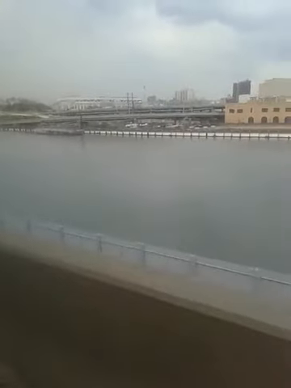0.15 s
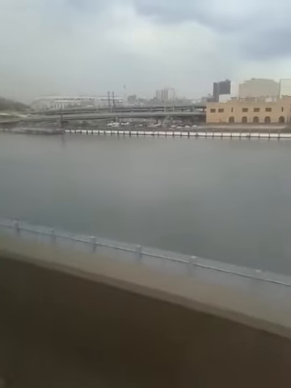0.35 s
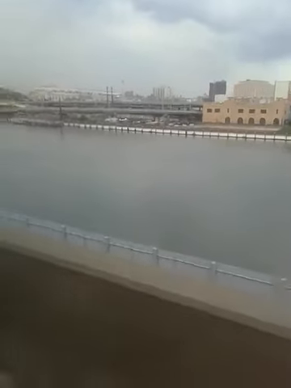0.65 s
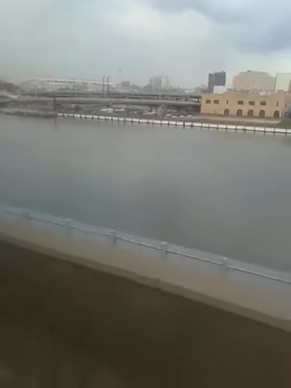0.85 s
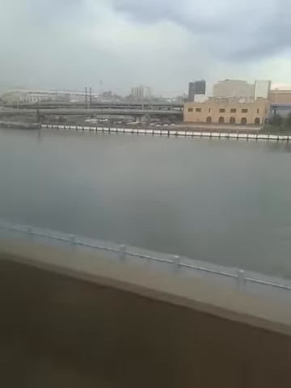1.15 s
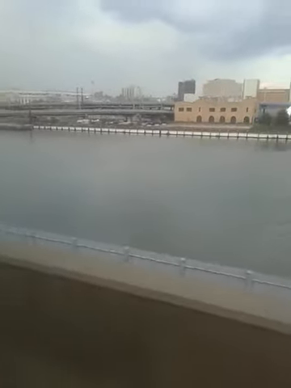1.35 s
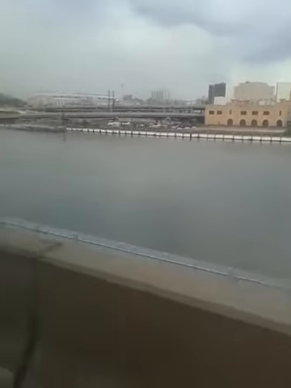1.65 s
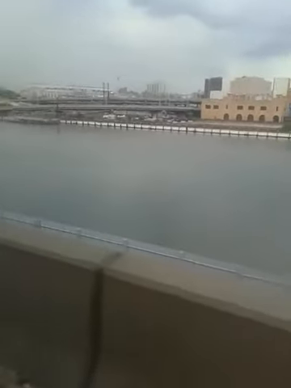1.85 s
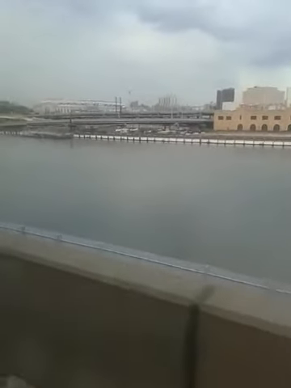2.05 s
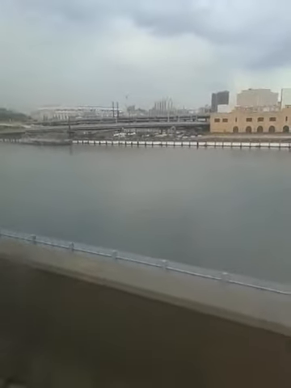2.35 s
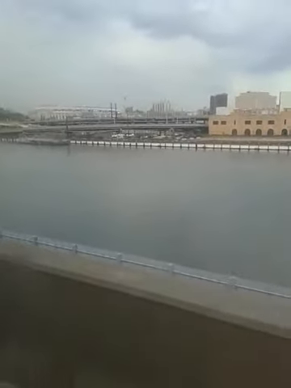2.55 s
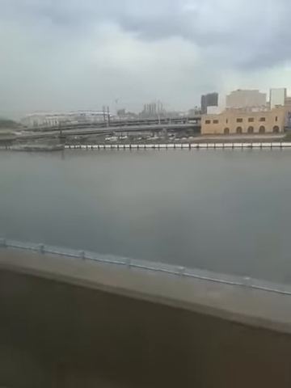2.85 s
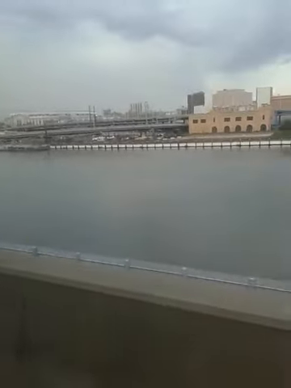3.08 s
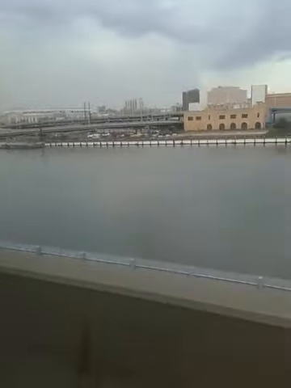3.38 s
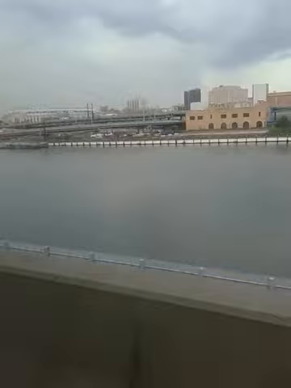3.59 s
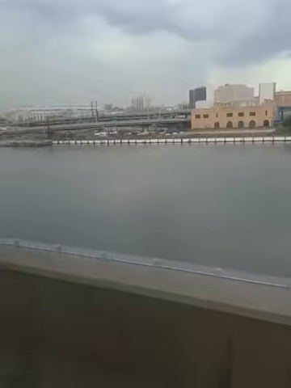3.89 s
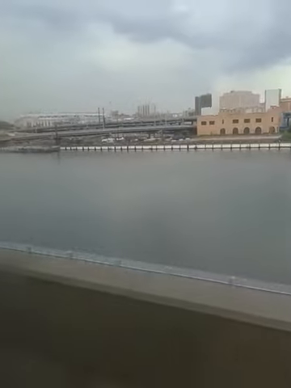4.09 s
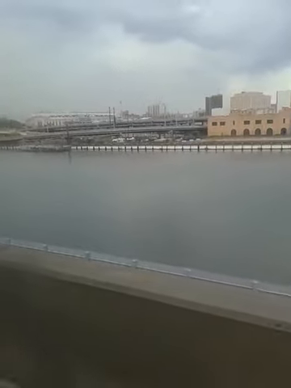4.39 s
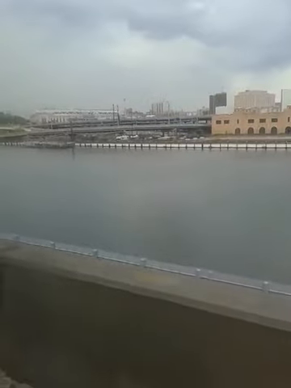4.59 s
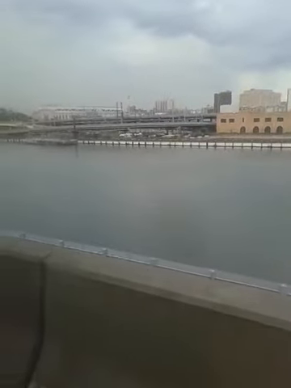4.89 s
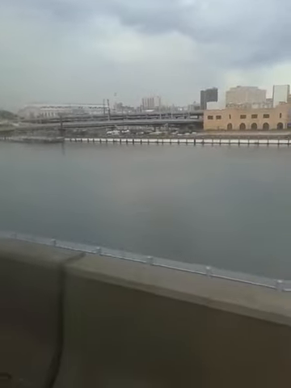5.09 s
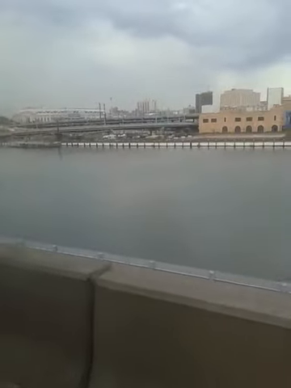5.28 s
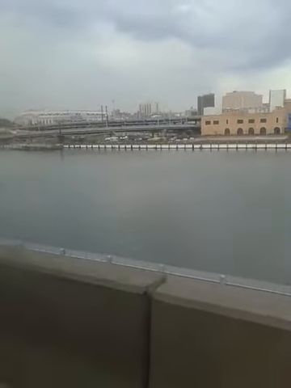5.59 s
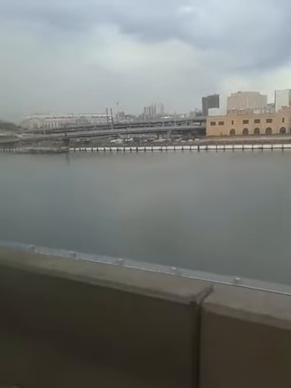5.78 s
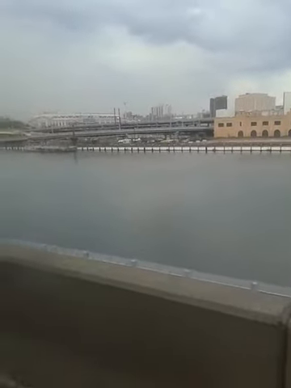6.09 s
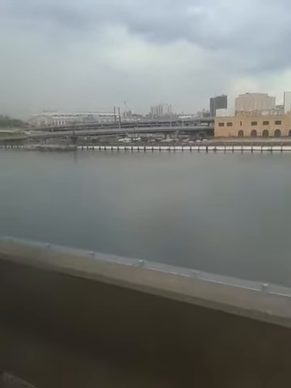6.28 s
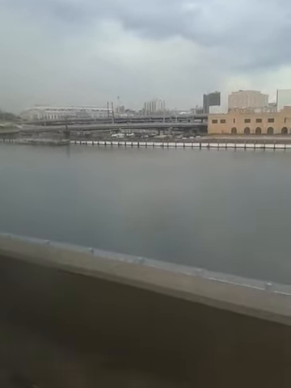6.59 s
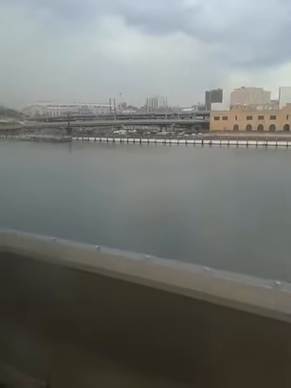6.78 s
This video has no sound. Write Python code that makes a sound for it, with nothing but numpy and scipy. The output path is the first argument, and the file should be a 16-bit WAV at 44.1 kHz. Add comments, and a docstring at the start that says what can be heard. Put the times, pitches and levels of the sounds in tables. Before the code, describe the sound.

Inside a bus on a riverside road, soft boomy rumble and tyre noise run throughout with thin steady hums. A low moan sinks at the start while cloth rustles near the microphone, with a few ticks at two seconds. A buzzing engine alongside swells to a peak past three seconds, then abruptly drops, sags in pitch and fades. A slower engine drones underneath, and a car slips past near the end.

```python
"""Inside a bus on a riverside road, an engine in the next lane swells, sags and fades. Its note is a stack of
sines, four firings a cycle, with noise for the exhaust. A slower engine drones in later and a car slips past
with a dropping note. Shaped noise makes the rumble of body and tyres; two thin hums keep their pitch, a faint
whistle and short squeaks sit high above, and a low moan sinks at the start. Cloth or fingers rustle and tick
close to the microphone, made of grainy noise and short knocks."""
import sys
import numpy as np
from scipy import signal
from scipy.fft import rfft, irfft, next_fast_len
from scipy.io import wavfile
from scipy.ndimage import uniform_filter1d

SR = 44100
rng = np.random.default_rng(int(sys.argv[2]) if len(sys.argv) > 2 else 0)


def generate_wav(sig):
    """Save sig (samples, or channels by samples) to the path in sys.argv[1] as 16-bit PCM at SR."""
    pcm = np.round(np.clip(np.atleast_2d(sig).T, -1, 1) * 32767).astype(np.int16)
    wavfile.write(sys.argv[1], SR, pcm)


N = 306054  # length in samples

# An "order" is how many times a tone repeats in one engine cycle.
# engine in the next lane: (time [s], firing rate [Hz], firing tone [dB], overtones [dB],
# orders between them [dB], exhaust roar [dB])
ENGINE_COURSE = [(0, 159, -39.5, -61, -45.5, -44.5), (.8, 157.8, -42.5, -54, -51.5, -46.5),
                 (1.35, 154.1, -39, -50.5, -49, -47.5), (1.8, 155.4, -28, -46, -44.5, -46),
                 (2.3, 155.8, -23.5, -42, -43.5, -43), (2.6, 155.6, -23, -38.5, -41.5, -41),
                 (2.82, 156.2, -18.5, -33.5, -37, -36.5), (3.05, 152.8, -15.5, -32, -39, -37),
                 (3.27, 145.6, -12, -27, -41.5, -32.5), (3.4, 145.8, -13, -25, -40.5, -31.5),
                 (3.6, 151.5, -15, -25.5, -43.5, -32.5), (3.75, 155.6, -16, -33, -41.5, -35.5),
                 (3.95, 156.1, -17, -26.5, -44, -38), (4.18, 156.1, -15, -28.5, -44.5, -41),
                 (4.3, 149, -31, -33.5, -50, -41.5), (4.42, 147, -25, -39.5, -44.5, -42.5),
                 (4.62, 141.6, -27, -51, -48.5, -44), (4.8, 138.5, -22.5, -45.5, -47.5, -45.5),
                 (5.1, 139.5, -33.5, -49, -54, -46.5), (5.6, 141.5, -39.5, -48.5, -55, -45),
                 (5.95, 143.3, -31, -49, -44.5, -43), (6.3, 140.7, -34.5, -51, -48, -44.5),
                 (6.94, 139.5, -42, -53, -50.5, -46.5)]
# strength moves from the lower side of the firing tones to the upper as the engine comes alongside:
# (time [s], orders below [dB], orders above [dB], upper firing tones [dB])
SIDE_LEVELS = [(0, -62, -61.5, -63), (2.05, -43.5, -49, -59), (2.75, -41, -46, -59), (3, -36, -56, -50),
               (3.24, -41, -33.5, -46), (3.36, -42.5, -36, -50), (3.5, -45, -34.5, -36),
               (3.7, -49.5, -54, -40.5), (4.15, -60, -55, -40.5), (4.33, -60.5, -50.5, -52),
               (5.1, -61.5, -56, -58), (6.94, -56, -58, -58.5)]
# overtones that stand out clean: (order, level re overtones [dB], fading [dB], phase slip [rad])
CLEAN_OVERTONES = [(8, 0, 1, 0.29), (12, -1, 3, 0.46)]
# clean orders between: (order, level re orders between [dB], fading [dB], phase slip [rad])
CLEAN_BETWEEN = [(2, 3, 3, .05), (3, 5.5, 2.3, .05), (10, -12, 5.7, .05)]
# weaker orders between, from unequal cylinders: (order, level re orders between [dB])
UNEVEN_ORDERS = [(1, -8), (5, -4), (6, -1.5), (14, -20), (18, -12.5)]
# upper firing tones: (order, level re upper firing tones [dB])
UPPER_TONES = [(16, -1), (20, -1.5), (24, -9), (28, -15)]
# one order below each firing tone: (order, level re orders below [dB])
ORDERS_BELOW = [(7, 0), (11, 0.5), (15, -14.5), (19, -18.5)]
# one order above each firing tone: (order, level re orders above [dB])
ORDERS_ABOVE = [(9, -2.5), (13, -0.5), (17, -3.5), (21, -8.5)]
# reflections cancel or lift one order for a moment: (time [s], order, width [s], change [dB])
REFLECTIONS = [(2.1, 4, 0.13, -14.5), (2.88, 4, 0.065, -13.5), (3.2, 4, 0.07, -10), (3.5, 4, 0.069, -9),
               (4.53, 4, 0.057, -14), (2.58, 8, 0.13, -15), (3.04, 8, 0.045, -12), (3.19, 8, 0.068, -12.5),
               (3.36, 8, 0.032, -18), (3.5, 8, 0.048, -16.5), (3.66, 8, 0.021, -14.5),
               (3.88, 8, 0.049, -15.5), (2.14, 12, .15, 5), (2.48, 12, .07, -6.5), (2.73, 12, 0.06, -12),
               (3.2, 12, .05, -8.5), (3.38, 12, .04, -13), (3.77, 12, 0.023, -9.5), (4.01, 12, .3, -7),
               (4.1, 12, .05, -7), (4.15, 12, .05, -12), (4.35, 12, .1, -3), (3.33, 3, .15, -11.5),
               (3.95, 3, .33, 7.5), (1.57, 2, .1, 10), (3.02, 6, .05, 12.5), (3.2, 10, 0.19, 15.5),
               (2.98, 11, 0.042, 3.5), (3.31, 11, .04, 12.5), (3.52, 12, 0.051, 2), (2.8, 16, .06, 10),
               (3.22, 17, 0.064, 5), (3.47, 16, .04, 4.5), (3.47, 17, .05, 3.5), (2.7, 2, .35, -3.5),
               (3.5, 21, .1, 5), (3.18, 7, .08, 6)]
# the weak orders waver up to this share more while the engine is closest
ALONGSIDE_S, ALONGSIDE_WIDTH_S, ROUGHER = 3.3, .3, .8
# colour of the exhaust roar: (pitch [Hz], strength [dB per Hz])
ROAR_COLOUR = [(100, -33), (200, -12), (400, -12.5), (700, -16), (950, -21.5), (1150, -26.5), (1800, -29),
               (2300, -29.5), (2800, -34.5), (3700, -42), (4400, -44), (5800, -56), (9000, -85)]
# raspy bursts in the exhaust: (time [s], width [s], level [dB])
RASP_BURSTS = [(3.335, .045, -48), (3.55, .055, -49)]
# colour of the bursts: (pitch [Hz], strength [dB per Hz])
RASP_COLOUR = [(1500, -40), (2100, -7.5), (2400, 0), (2750, -8), (3600, -40)]
# slower engine: (time [s], fifth order [Hz], fifth order [dB], high orders [dB])
DRONE_COURSE = [(4.1, 126.4, -33, -54), (4.3, 126.3, -27.5, -51.5), (4.65, 126.1, -42, -58),
                (5.2, 125.3, -34.5, -58.5), (5.5, 124.6, -30.5, -49), (5.75, 125.5, -30, -46),
                (6.02, 125.3, -24, -36), (6.2, 125.2, -28, -41), (6.35, 124.6, -33, -40),
                (6.5, 122.7, -29.5, -38.5), (6.65, 120.5, -39, -40.5), (6.8, 117.7, -30, -40.5),
                (6.94, 115, -26.5, -39)]
# its other orders: (order, level re high orders [dB])
DRONE_OTHER_ORDERS = [(2, -6), (3, -9.5), (7, -2), (9, -0.5), (10, -1), (11, -9.5)]
FOURTH_DB = 4.5  # its fourth order, re high orders
# car going by: (time [s], note [Hz], level [dB])
PASSING_COURSE = [(0, 297.3, -87.5), (5.5, 289, -67.5), (5.68, 288, -48), (5.8, 274.2, -40),
                  (5.92, 269.2, -41), (6.05, 264.7, -54), (6.2, 266, -76), (6.94, 263.7, -90)]
# road felt through the bus: (time [s], body boom [dB], deepest shudder [dB])
ROAD_LEVELS = [(0, -35.5, -52), (.25, -35, -46), (.56, -43, -44), (.95, -36.5, -49), (1.3, -40, -46),
               (1.66, -36.5, -45), (2, -43, -48), (2.3, -33.5, -46), (2.65, -32.5, -41),
               (2.8, -38.5, -38.5), (2.92, -32, -38), (3.3, -33.5, -43.5), (4.05, -42.5, -44),
               (4.6, -37.5, -48), (5.1, -39, -43), (5.8, -36, -41), (6.45, -33.5, -49), (6.94, -48, -47)]
# colour of the body boom: (pitch [Hz], strength [dB per Hz])
BOOM_COLOUR = [(35, -40), (60, -7), (85, 3), (130, -4.5), (200, -16), (280, -11.5), (390, -45.5),
               (660, -120)]
# colour of the deepest shudder: (pitch [Hz], strength [dB per Hz])
SHUDDER_COLOUR = [(12, -39.5), (25, -18), (40, -8), (52, 0.5), (65, -4.5), (90, -31), (200, -120)]
# colour of the tyre noise: (pitch [Hz], strength [dB per Hz])
TYRE_COLOUR = [(80, -28), (150, 4.5), (250, -5.5), (330, -25), (450, -6.5), (600, -15), (950, -10),
               (1150, -16.5), (2000, -24.5), (2700, -29.5), (3100, -33), (4700, -38), (5300, -44.5),
               (6800, -49), (15700, -53)]
# separate rustles: (time of peak [s], time to rise or lose 20 dB [s], ringing part [dB], airy part [dB])
RUSTLES = [(0.070, 0.040, -83.0, -74.0), (0.200, 0.050, -69.0, -75.0), (0.260, 0.040, -73.0, -74.0),
           (0.350, 0.055, -59.0, -66.0), (0.440, 0.060, -71.0, -74.0), (0.530, 0.075, -63.0, -67.0),
           (0.600, 0.020, -69.0, -85.0), (0.660, 0.025, -65.0, -78.0), (0.700, 0.020, -68.0, -82.0),
           (0.760, 0.020, -73.0, -85.0), (0.900, 0.055, -71.0, -76.0), (0.990, 0.040, -75.0, -82.0),
           (1.180, 0.070, -73.0, -80.0), (1.280, 0.040, -73.0, -77.0), (1.400, 0.070, -90.0, -70.0),
           (1.458, 0.040, -74.0, -64.0), (1.685, 0.050, -80.0, -67.0), (1.857, 0.050, -77.0, -60.0),
           (1.980, 0.070, -80.0, -71.0), (2.085, 0.030, -59.0, -68.0), (2.120, 0.035, -50.0, -63.0),
           (2.165, 0.045, -53.0, -63.0), (2.235, 0.075, -60.0, -70.0), (2.340, 0.040, -72.0, -82.0),
           (2.545, 0.070, -67.0, -78.0), (2.680, 0.050, -85.0, -75.0), (2.720, 0.055, -68.0, -76.0),
           (2.985, 0.075, -63.0, -68.0), (3.330, 0.100, -71.0, -71.0), (3.530, 0.080, -78.0, -71.0),
           (4.070, 0.090, -75.0, -68.0), (5.170, 0.100, -74.0, -78.0), (6.000, 0.030, -79.0, -75.0),
           (6.360, 0.080, -77.0, -76.0), (6.900, 0.040, -81.0, -75.0)]
RINGING_REST_DB, AIRY_REST_DB = -84, -79  # between rustles
# colour of the airy part: (pitch [Hz], strength [dB per Hz])
AIRY_COLOUR = [(5000, -34), (8000, -7), (11000, -2), (13000, 2), (15700, 2)]
# ticks, before they are brightened and ring: (time [s], snap [dB], scrape [dB], time to lose 60 dB [s])
TICK_BLOWS = [(1.837, -52, -52, .004), (2.0958, -36, -40, .004), (2.1075, -54, -44, .008),
              (2.1125, -39, -29, .012), (2.1245, -46, -40, .007), (2.129, -46, -38, .007),
              (6.457, -66, -51, .004), (6.4764, -38, -50, .004)]
# resonances of the microphone opening: (pitch [Hz], width [Hz], gain [dB])
PORT_RESONANCES = [(7100, 450, -12.5), (9300, 400, 1), (4770, 1700, -16)]
# low and high hum: (low [Hz], high [Hz])
HUM_PITCHES = 369.9, 521.4
# their levels: (time [s], low hum [dB], high hum [dB])
HUM_LEVELS = [(0, -43, -44.5), (.7, -44, -47.5), (1.15, -51.5, -54), (1.9, -47, -45.5), (2.6, -43, -43.5),
              (3.5, -45.5, -47.5), (4.5, -44.5, -45.5), (6.94, -45, -46.5)]
# weaker hums: (pitch [Hz], level [dB])
WEAK_HUMS = [(921, -59), (1049, -60)]
# faint whistle in the hiss: (time [s], pitch [Hz], level [dB])
WHISTLE_COURSE = [(0, 4580, -90), (.6, 4580, -83), (.9, 4570, -77), (1.3, 4560, -83), (1.8, 4560, -95),
                  (6.94, 4550, -95)]
# sinking moan: (time [s], pitch [Hz], level [dB])
MOAN_COURSE = [(0, 94, -55), (.2, 91.8, -38.5), (.6, 91.3, -43), (.9, 87.5, -41), (1.2, 81.23, -42),
               (1.45, 76.2, -38), (1.8, 70.9, -33.5), (2, 68.3, -49)]
# faint squeaks: (time [s], length [s], start [Hz], middle [Hz], end [Hz], peak level [dB])
SQUEAK_BENDS = [(2.56, .035, 12310, 12500, 12800, -81), (2.64, 0.088, 13780, 14600, 14100, -80.5),
                (2.66, .15, 11730, 12300, 12200, -79.5), (2.81, 0.1, 11650, 11880, 11650, -72),
                (2.824, .03, 12300, 12450, 12600, -71), (2.89, 0.068, 12620, 12170, 12500, -80)]
TOP_HZ = 15750  # band limit of the recorder


def amp(db):
    """Turn dB into a gain."""
    return np.exp(np.asarray(db) * (np.log(10) / 20))


def unit(x):
    """Scale a sound to rms 1."""
    return x / np.sqrt(np.mean(x ** 2) + 1e-20)


def curves(rows):
    """Join the table points by straight lines: one curve for each column after the time."""
    times, *columns = np.transpose(rows)
    return [np.interp(np.arange(N) / SR, times, column) for column in columns]


def wobble(rate):
    """A random curve of straight lines between knots, rate knots a second."""
    knots = rng.standard_normal(int(N * rate / SR) + 4)
    return np.interp(np.arange(N) * rate / SR, np.arange(len(knots)), knots)


def bell(s, width):
    """A smooth bump of height 1 around s seconds."""
    coarse = np.arange(0, N + 64, 64)
    return np.interp(np.arange(N), coarse, np.exp(-((coarse / SR - s) / width) ** 2))


def filtered(x, response, mirror="even"):
    """Filter x by a response to frequency; mirrored ends keep steep filters from ringing."""
    edge = 4096
    size = next_fast_len(N + 2 * edge)
    padded = np.pad(x, (edge, size - N - edge), "reflect", reflect_type=mirror)
    spectrum = rfft(padded * signal.windows.tukey(size, edge / size))
    return irfft(spectrum * response(np.fft.rfftfreq(size, 1 / SR)), size)[edge:edge + N]


def shape(points):
    """A gain for each frequency, read from a colour table on a log pitch axis."""
    hz_points, db_points = np.transpose(points)
    return lambda hz: amp(np.interp(np.log(hz + 1), np.log(hz_points + 1), db_points))


def rush(colour, patchy_db):
    """Coloured noise of rms 1, with patches of random gain in time and pitch."""
    noise = signal.stft(rng.standard_normal(N), nperseg=512)[2]
    patches = uniform_filter1d(rng.standard_normal(noise.shape), size=6, axis=0)
    patches = uniform_filter1d(patches, size=14, axis=1)
    patchy = signal.istft(noise * amp(patchy_db * unit(patches)), nperseg=512)[1][:N]
    return unit(filtered(patchy, shape(colour)))


def tone(turns, db, fade_db=0., slip=0., rate=6):
    """A sine of rms level db; reflections make it fade and slip in phase (slip in rad) at random."""
    level = np.sqrt(2) * amp(db + fade_db * wobble(rate))
    start = rng.random()
    return level * np.sin(2 * np.pi * (turns + start) + slip * wobble(2.5 * rate))


def shift_db(order):
    """The summed momentary changes that reflections make to one order."""
    return sum(db * bell(s, width) for s, k, width, db in REFLECTIONS if k == order)


def engine():
    """Four firings a cycle give a tone and overtones; uneven ones add weak orders between them."""
    hz, firing_db, over_db, between_db, roar_db = curves(ENGINE_COURSE)
    below_db, above_db, upper_db = curves(SIDE_LEVELS)
    rough = 1 + ROUGHER * bell(ALONGSIDE_S, ALONGSIDE_WIDTH_S)
    cycle = np.cumsum(hz) / SR / 4
    out = tone(4 * cycle, firing_db + shift_db(4), fade_db=.7, rate=9)
    for rows, base_db in ((CLEAN_OVERTONES, over_db), (CLEAN_BETWEEN, between_db)):
        for k, db, fade_db, slip in rows:
            out = out + tone(k * cycle, base_db + db + shift_db(k), fade_db, slip, rate=10)
    for rows, base_db in ((UNEVEN_ORDERS, between_db), (UPPER_TONES, upper_db),
                          (ORDERS_BELOW, below_db), (ORDERS_ABOVE, above_db)):
        for k, db in rows:
            level_db = base_db + db + shift_db(k)
            out = out + tone(k * cycle, level_db, fade_db=3, slip=.035 * k * rough, rate=16)
    # the exhaust roar is noise puffed out once a firing
    puffs = 1 + .18 * np.sin(2 * np.pi * 4 * cycle)
    roar = amp(roar_db + wobble(9)) * puffs * rush(ROAR_COLOUR, patchy_db=1.4)
    return out + roar


def rasp():
    """Exhaust bursts: grainy noise in one pipe resonance."""
    grains = rush(RASP_COLOUR, patchy_db=1.5) * amp(3.3 * wobble(60))
    return sum(amp(db) * bell(s, width) for s, width, db in RASP_BURSTS) * grains


def drone():
    """A slower engine, a stack of orders led by the fifth, fades in as the first falls back."""
    hz, fifth_db, high_db = curves(DRONE_COURSE)
    cycle = np.cumsum(hz) / SR / 5
    out = tone(5 * cycle, fifth_db, fade_db=1.2)
    out = out + tone(4 * cycle, high_db + FOURTH_DB, fade_db=4)
    for k, db in DRONE_OTHER_ORDERS:
        out = out + tone(k * cycle, high_db + db, fade_db=2.5, slip=.25)
    fade_in = np.clip((np.arange(N) / SR - DRONE_COURSE[0][0]) / 0.37, 0, 1)
    return out * fade_in


def passing():
    """A short tone and its octave, lowered as the car moves past."""
    hz, db = curves(PASSING_COURSE)
    turns = np.cumsum(hz) / SR
    return tone(turns, db, slip=0.33) + tone(2 * turns, db - 8, slip=0.54)


def handling():
    """Ticks of cloth or fingers: a snap and a scrape each, ringing the microphone opening."""
    blows = np.zeros(N + SR)
    t = np.arange(SR // 30) / SR
    snap = 1.6 * amp(-60 * t / .0012) * np.cos(2 * np.pi * 3800 * t)
    for s, snap_db, scrape_db, t60 in TICK_BLOWS:
        swell = 1 - np.exp(-15 * t / t60)
        scrape = amp(scrape_db - 60 * t / t60) * swell * rng.standard_normal(len(t))
        blows[round(s * SR):][:len(t)] += amp(snap_db) * snap + scrape
    # weaken what lies below 1500 Hz, soften what lies above 9000 Hz
    bright = filtered(blows[:N], lambda f: 1j * f / (1500 + 1j * f) / (1 + 1j * f / 9000))
    return bright + 3 * filtered(bright, port)


def port(f):
    """The ringing of the microphone opening: resonances added with alternating sign."""
    return sum((-1) ** k * amp(db) * 1j * f * width / (centre ** 2 - f * f + 1j * f * width)
               for k, (centre, width, db) in enumerate(PORT_RESONANCES))


def rustling():
    """Dense tiny scrapes that swell and die around each rustle, partly ringing and partly airy."""
    t = np.arange(N) / SR
    coarse = t[::64]
    s, fall, ringing_db, airy_db = np.transpose(RUSTLES)[:, :, None]
    drop_db = 20 * abs((coarse - s) / fall) ** 1.5
    ringing_swell = np.interp(t, coarse, amp(ringing_db - drop_db).sum(axis=0))
    airy_swell = np.interp(t, coarse, amp(airy_db - drop_db).sum(axis=0))
    ringing = unit(filtered(rng.standard_normal(N) * amp(3 * wobble(300)), port))
    airy = unit(filtered(rng.standard_normal(N) * amp(1.5 * wobble(300)), shape(AIRY_COLOUR)))
    return (amp(RINGING_REST_DB) + ringing_swell) * ringing + (amp(AIRY_REST_DB) + airy_swell) * airy


def moan():
    """One low tone sliding down and away."""
    hz, db = curves(MOAN_COURSE)
    fade_out = np.clip((MOAN_COURSE[-1][0] - np.arange(N) / SR) / 0.1577, 0, 1)
    return tone(np.cumsum(hz) / SR, db, slip=0.9) * fade_out


def squeaks():
    """Short thin whistles with a bending pitch, as of rubber rubbing on glass."""
    out = np.zeros(N)
    for s, length, *hz, db in SQUEAK_BENDS:
        u = np.linspace(0, 1, round(length * SR))
        bend = np.polyval(np.polyfit([0, .5, 1], hz, 2), u)
        swell = np.sqrt(np.sin(np.pi * u) + 1e-9)
        out[round(s * SR):][:len(u)] += amp(db) * swell * np.sin(2 * np.pi * np.cumsum(bend) / SR)
    return out


def hums():
    """Thin tones of fixed pitch that waver a little, and a smeared whistle far above them."""
    t = np.arange(N) / SR
    out = np.zeros(N)
    for hz, db in zip(HUM_PITCHES, curves(HUM_LEVELS)):
        out = out + tone(hz * t, db, fade_db=2.3, slip=.3, rate=10)
    for hz, db in WEAK_HUMS:
        out = out + tone(hz * t, db, fade_db=4, slip=.9, rate=8)
    whistle_hz, whistle_db = curves(WHISTLE_COURSE)
    return out + tone(np.cumsum(whistle_hz) / SR, whistle_db, fade_db=3.6, slip=1.2, rate=22)


def road():
    """Body boom, a deeper shudder and nearly steady tyre noise, all coloured noise."""
    boom_db, shudder_db = curves(ROAD_LEVELS)
    boom = amp(boom_db) * rush(BOOM_COLOUR, patchy_db=.5)
    shudder = amp(shudder_db) * rush(SHUDDER_COLOUR, patchy_db=.8)
    tyres = amp(-39.5 + 0.43 * wobble(1.7)) * rush(TYRE_COLOUR, patchy_db=0.48)
    return boom + shudder + tyres


def scene():
    """The sounds of all sources add up at one microphone."""
    vehicles = engine() + rasp() + drone() + passing()
    close_by = handling() + rustling()
    background = moan() + squeaks() + hums() + road()
    return (vehicles + close_by + background)[None]


def record(dry):
    """The recorder keeps nothing above its band limit."""
    return filtered(dry[0], lambda hz: hz < TOP_HZ, mirror="odd")[None]


dry = scene()
out = record(dry)
generate_wav(out)
```